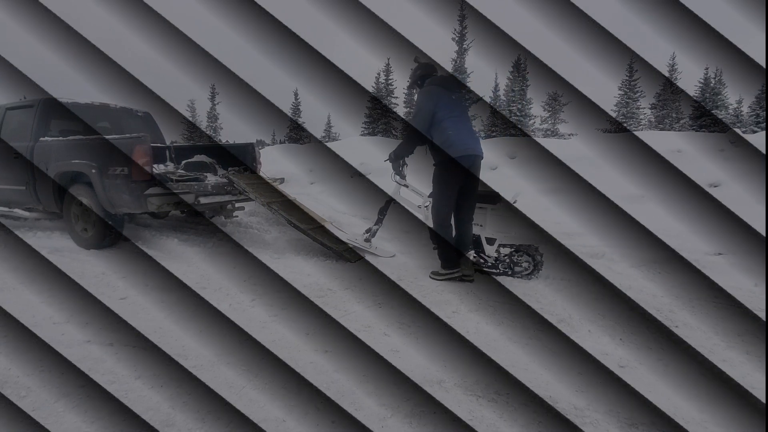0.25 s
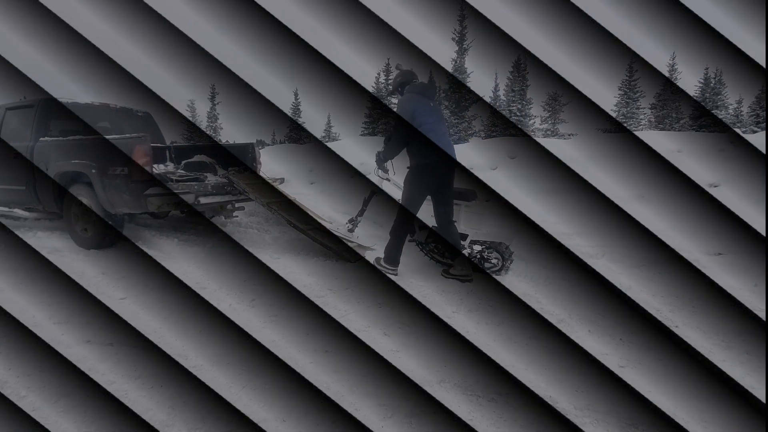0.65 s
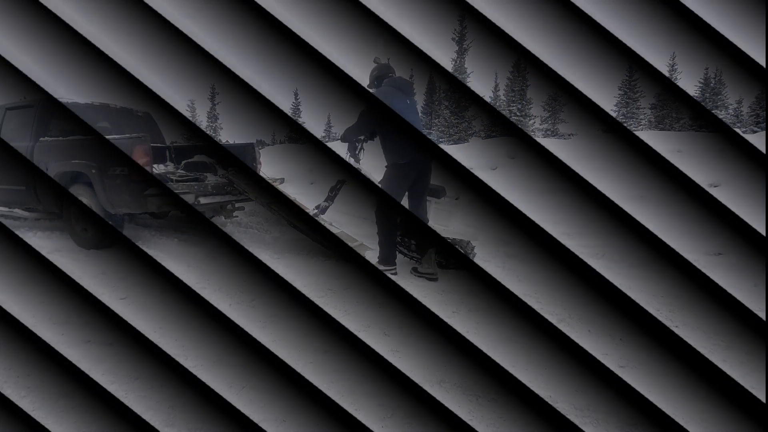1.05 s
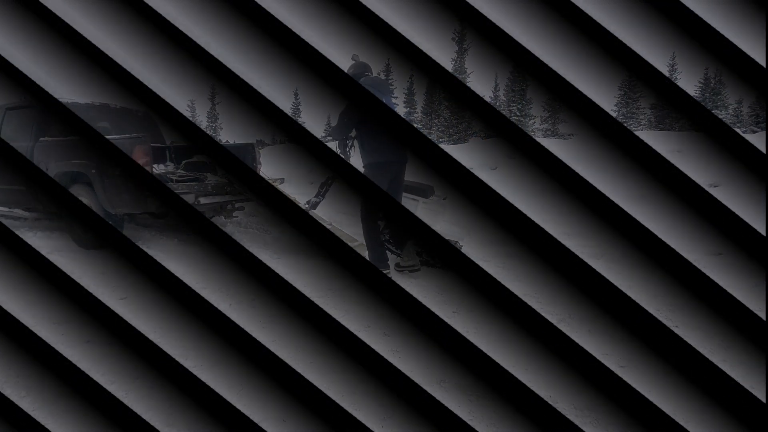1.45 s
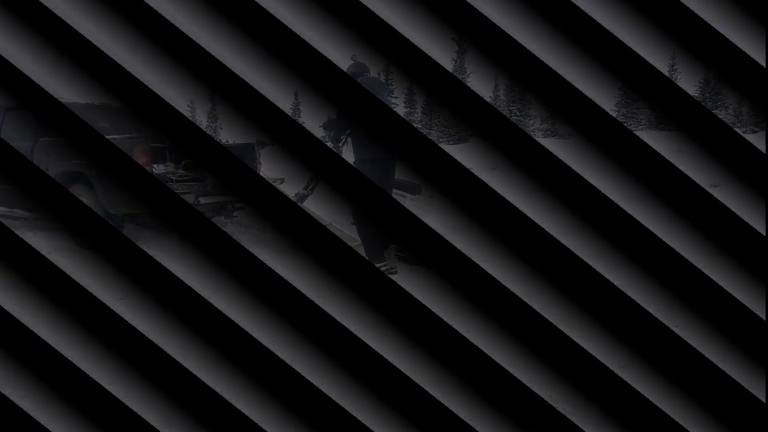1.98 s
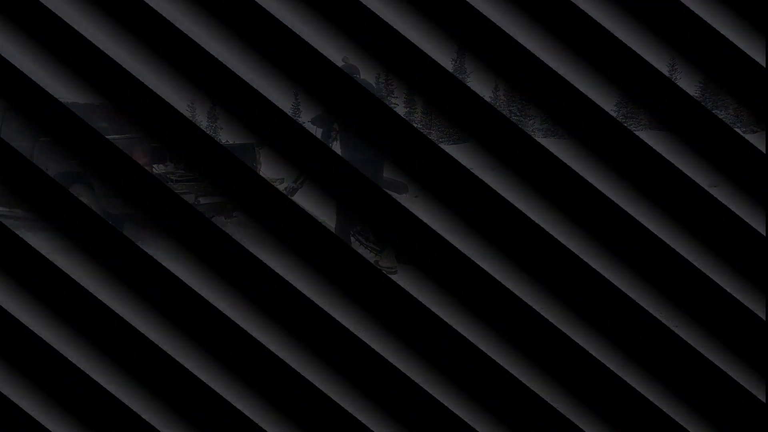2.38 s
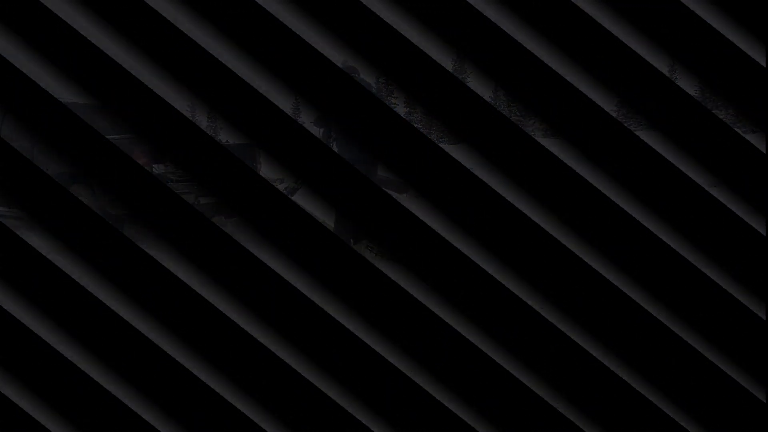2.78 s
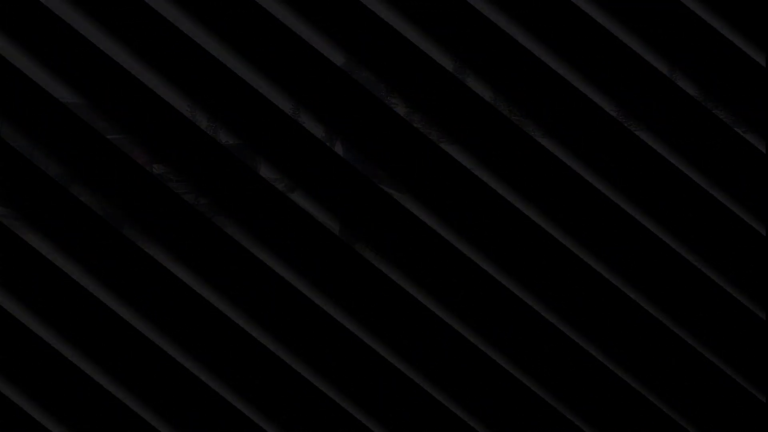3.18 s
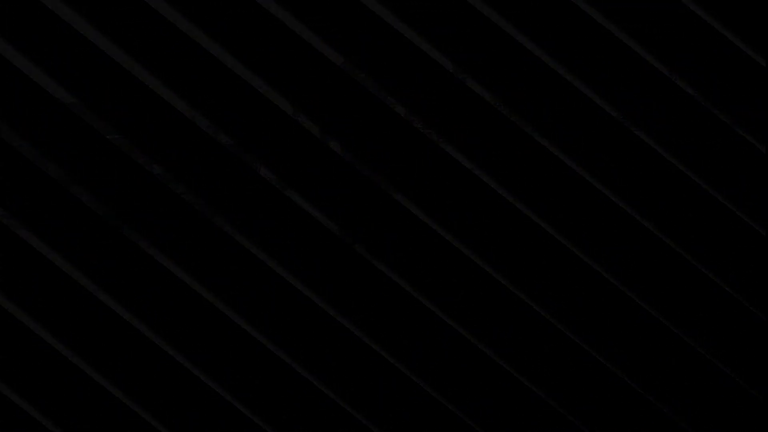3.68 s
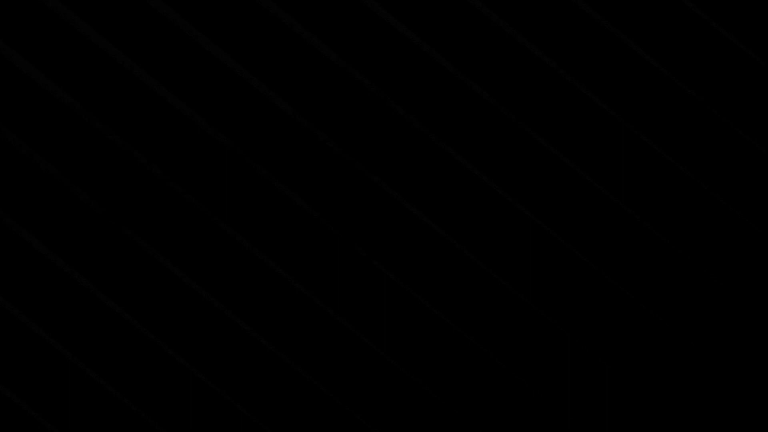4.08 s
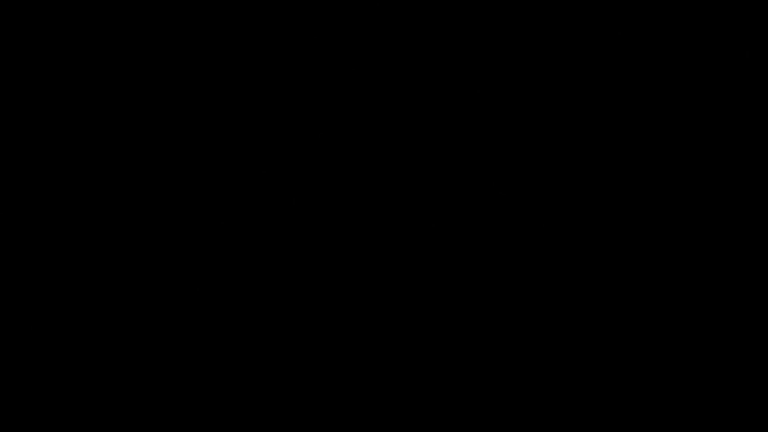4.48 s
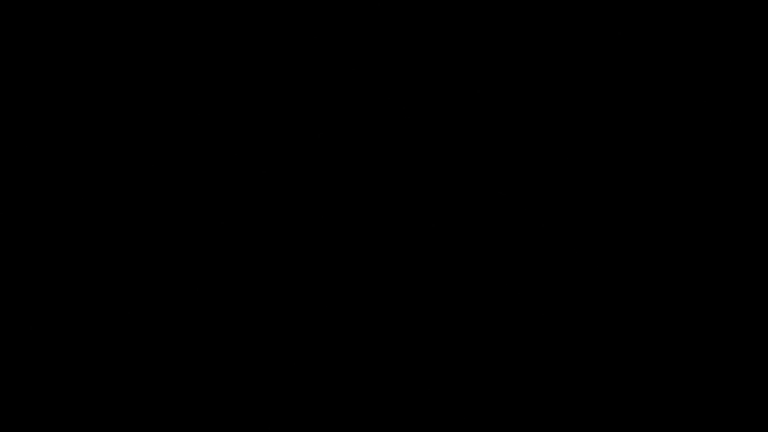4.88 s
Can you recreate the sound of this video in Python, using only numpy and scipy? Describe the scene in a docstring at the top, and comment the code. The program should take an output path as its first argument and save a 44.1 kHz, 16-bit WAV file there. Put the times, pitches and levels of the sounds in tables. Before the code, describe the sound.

Snow rustles and creaks under a clattering track with hollow thumps, a harsh gritty scrape, a pause, then loud bangs and a brief squeak.

```python
"""Outdoors on open snow: an electric tracked bike crawls over snow and up a wooden ramp.
The track rumbles and rustles as filtered noise and grains, with its effort and at every jolt.
Snow creaks in runs of grains, a hollow body booms as ringing modes, hard parts clack as noise bursts.
Halfway two layers of grains make a loud gritty scrape.
At the end a pulsed-noise rasp tightens into a harmonic squeak, with a bang."""
import sys
import numpy as np
from scipy import signal
from scipy.fft import rfft, irfft, next_fast_len
from scipy.io import wavfile
from scipy.ndimage import uniform_filter1d

SR = 44100
rng = np.random.default_rng(int(sys.argv[2]) if len(sys.argv) > 2 else 0)


def int16_out(signal):
    """Quantize to a 16-bit WAV file."""
    q = np.round(np.clip(np.atleast_2d(signal).T, -1, 1) * 32767)
    wavfile.write(sys.argv[1], SR, q.astype(np.int16))


N = 226751
PADDED = next_fast_len(N, real=True)
TIME_S = np.arange(N) / SR
FREQ_HZ = np.maximum(np.fft.rfftfreq(PADDED, 1 / SR), 1)


def undb(db):
    """Decibels to amplitude gain."""
    return 10 ** (np.asarray(db) / 20)


def unit(x):
    """Scale to rms 1."""
    return x / np.sqrt(np.mean(x ** 2))


def curves(rows):
    """Each column of a table, interpolated linearly in time."""
    s, *columns = np.transpose(rows)
    return [np.interp(TIME_S, s, column) for column in columns]


def spectra(rows):
    """Each column of a table, interpolated linearly in log frequency."""
    hz, *columns = np.transpose(rows)
    return [np.interp(np.log(FREQ_HZ), np.log(hz), column) for column in columns]


def colour(x, points):
    """Filter by a (frequency [Hz], level [dB]) spectrum, to rms 1."""
    spectrum = rfft(x, PADDED) * undb(spectra(points)[0])
    return unit(irfft(spectrum, PADDED)[..., :N])


def add(out, s, x):
    """Mix a sound in at time s."""
    start = max(int(s * SR), 0)
    out[..., start:start + x.shape[-1]] += x[..., :N - start]


def swells(rows, attack_s, t60_s):
    """Gain of events that each rise, hold and die away; their powers add."""
    power = np.zeros(N)
    t = TIME_S[:SR]
    for s, length_s, db in rows:
        rise = np.minimum(t / attack_s, 1)
        fall_db = -60 * np.maximum(t - length_s, 0) / t60_s
        add(power, s, (rise * undb(db + fall_db)) ** 2)
    return np.sqrt(power)


def grains(rate_hz, spread_db, decay_s):
    """Two channels of noise in dense little bursts, many small and a few large."""
    chance = rng.random(N)
    size = np.minimum(rng.exponential(size=N), np.pi)
    power = (chance < rate_hz / SR) * undb(spread_db * size) ** 2
    power = signal.lfilter([1], [1, -np.exp(-2 / (decay_s * SR))], power)
    return np.sqrt(power) * rng.standard_normal((2, N))


# narrow resonances of the hard sounds: (frequency [Hz], width [Hz], gain [dB])
SHELL = [(752, 86, 2), (1590, 220, 2), (3220, 530, 2), (3725, 670, 12.5), (4360, 46, 6)]


def shell(x):
    """Boost the narrow resonances in a sound, one after another."""
    for hz, width_hz, db in SHELL:
        ring = signal.lfilter(*signal.iirpeak(hz, hz / width_hz, fs=SR), x)
        x = x + (undb(db) - 1) * ring
    return x


# modes of the hollow body: (frequency [Hz], level [dB], t60 [s])
BODY = [(50, -6.5, .2), (75.6, -14.5, 0.074), (93.6, -10.5, 0.33), (106, -24, 0.13), (130, -19, 0.34),
        (166.7, 6, 0.093), (202.6, -2.5, 0.091), (220, 0.5, 0.037), (294, -4, 0.066), (377.2, 3, 0.054),
        (435.5, 2.5, 0.44), (523, -10.5, 0.045)]


def body(x):
    """Ring the hollow body's modes, in parallel, with a noise input."""
    out = 0
    for hz, db, t60_s in BODY:
        q = hz * t60_s * np.pi / np.log(1000)
        out = out + undb(db) * signal.lfilter(*signal.iirpeak(hz, q, fs=SR), x)
    return out


# track work before and after the scrape: (time [s], effort as grit level [dB], hiss before trim [dB])
APPROACH, CLIMB = [
    [(0.0, -57, -66), (0.2, -69.5, -59), (0.43, -58, -54.5), (0.62, -55, -54.5), (0.84, -57, -62.5),
     (1.22, -52, -52), (1.44, -68, -66), (1.63, -73.5, -71), (2.2, -55.5, -60.5)],
    [(2.63, -77.5, -69.5), (3.42, -74.5, -82.5), (3.55, -65.5, -69), (3.83, -58, -74.5), (3.97, -57.5, -63),
     (4.23, -59.5, -66.5), (4.49, -56.5, -62.5), (4.72, -63, -67), (5.0, -60.5, -68)],
]
# puffs of fine hiss: (time [s], length [s], level [dB])
PUFFS = [(0.68, 0.13, -52), (2.975, 0.026, -62), (3.16, .07, -64), (3.39, 0.13, -65.5), (3.79, 0.13, -59),
         (4.35, .06, -49), (4.54, 0.027, -53)]
# hiss spectrum: (frequency [Hz], level [dB])
HISS = [(2000, -26), (4500, -6.5), (8000, -2.5), (9200, 2.5), (10300, -0.5), (15500, 2)]
PUFF_ATTACK_S, PUFF_T60_S, HISS_TRIM_DB = 0.006, 0.14, 3


def hiss():
    """Fine grains, nearly all in the middle, swell with the track and come in puffs."""
    mid, side = colour(grains(rate_hz=1100, spread_db=4.5, decay_s=0.0069), HISS)
    steady = undb(curves([*APPROACH, *CLIMB])[1] + HISS_TRIM_DB)
    gain = np.hypot(steady, swells(PUFFS, PUFF_ATTACK_S, PUFF_T60_S))
    return (mid + undb(-27.5) * side * np.array([[1], [-1]])) * gain


# packed snow under load: (time [s], length [s], level [dB])
CREAKS = [(1.44, 0.031, -48.5), (1.52, 0.031, -52.5), (1.635, 0.023, -53), (1.675, 0.012, -47),
          (1.72, 0.082, -49), (1.815, 0.17, -47.5), (3.095, .04, -48), (3.58, 0.16, -48),
          (3.95, 0.084, -48.5)]
# creak spectrum: (frequency [Hz], level [dB])
CREAK = [(250, -9), (450, 1), (750, 2), (1300, -3), (1700, -13), (2300, -22), (4000, -29.5), (9000, -37)]
CREAK_ATTACK_S, CREAK_T60_S = 0.0038, 0.044


def creaks():
    """Packed snow gives way in runs of small dull cracks."""
    cracks = colour(grains(rate_hz=420, spread_db=2.0, decay_s=0.004), CREAK)
    return cracks * swells(CREAKS, CREAK_ATTACK_S, CREAK_T60_S)


# modes of a small hard part: (frequency [Hz], level [dB], t60 [s])
CLICK = [(1490, -16.5, 0.022), (3000, -15.5, 0.0063), (3710, 0.5, 0.0071), (5150, -10, 0.0067),
         (9600, -8, 0.0052)]
CLICK_S, CLICK_DB = 0.5419, -13


def click():
    """A small hard part snaps once and rings for a few milliseconds."""
    out, t = np.zeros(N), TIME_S[:SR // 10]
    modes = [np.sin(2 * np.pi * hz * t) * undb(CLICK_DB + db - 60 * t / t60_s) for hz, db, t60_s in CLICK]
    add(out, CLICK_S, sum(modes))
    return out


# hard contacts: (time [s], woody level [dB], sharp level [dB], snap level [dB], length [factor])
CLACKS = [(0.124, -37.5, -56, -64, 0.98), (0.543, -37.5, -27.5, -43, 1), (0.698, -35.5, -36.5, -49, 0.82),
          (1.004, -24, -38.5, -58, 0.97), (1.315, -30.5, -31, -30.5, 0.92), (1.635, -40, -73, -67, 0.56),
          (1.718, -44, -61, -70, 0.31), (2.22, -51.5, -59, -42, 1), (2.254, -24, -24, -59, 1.3),
          (2.289, -26, -33, -51, 3.9), (2.34, -37.5, -18, -38, 1.6), (2.351, -35.5, -23, -36, 1.6),
          (2.375, -30, -14.5, -31, 1), (2.393, -27, -27, -43, 1.6), (2.4724, -29, -17.5, -35, .6),
          (2.503, -33, -23, -42, 1), (2.551, -29, -29.5, -41.5, 1.7), (2.822, -42.5, -74, -68, 0.83),
          (2.915, -42, -41, -43.5, 0.33), (2.972, -35.5, -50, -61, 1.5), (3.3605, -34.5, -81, -76, .7),
          (3.382, -17, -48, -55, 0.87), (3.821, -24, -48, -56, 0.64), (4.241, -33.5, -40.5, -49, 0.77),
          (4.304, -43, -49.5, -49, 6.3), (4.35, -35.5, -44, -39.5, 2.1), (4.424, -28, -48, -45, 1.3),
          (4.462, -24.5, -33, -36.5, 0.79), (4.517, -37, -50, -34.5, 0.54),
          (4.565, -24.5, -29.5, -35.5, 0.97), (4.576, -32.5, -38, -41, 1.64),
          (4.634, -31, -38.5, -44.5, 1.17), (4.785, -35, -50.5, -49.5, 1.1), (5.093, -21, -35, -43, 0.86)]
CONTACT_RISE_S = 0.00025


def burst(column, spectrum, t60_s, tail_db, tail_t60_s):
    """One colour of all clacks: a fast crack plus a weaker tail, at that column's levels."""
    level, t = np.zeros(N), TIME_S[:SR // 4]
    rise = 1 - np.exp(-t / CONTACT_RISE_S)
    tail = undb(tail_db - 60 * t / tail_t60_s)
    for row in CLACKS:
        crack = undb(-60 * t / (t60_s * max(row[-1], 0.1)))
        add(level, row[0], rise * (crack + tail) * undb(row[column]))
    noise = colour(shell(rng.standard_normal((2, N))), spectrum)
    # flatten the noise so a single blow dies away evenly
    return level * noise / np.sqrt(uniform_filter1d(noise ** 2, size=200))


# clack spectra: (frequency [Hz], level [dB per Hz])
WOODY = [(150, 0), (400, 12), (620, -0.5), (850, 2), (1200, -3), (1500, -8), (2100, -8.5), (2600, -39.5),
         (5000, -52)]
SHARP = [(900, -15.5), (1900, -1), (2700, 7), (3600, -4), (4500, -0.5), (5400, -5), (7000, -8),
         (10000, -22.5), (15000, -21)]
SNAP = [(3000, -10), (6000, -4.5), (9500, -0.5), (15000, -2.5)]


def clacks():
    """Hard contacts: noise bursts in woody, sharp and snapping colours."""
    woody = burst(1, WOODY, t60_s=0.063, tail_db=-32.5, tail_t60_s=0.083)
    sharp = burst(2, SHARP, t60_s=0.025, tail_db=-25.0, tail_t60_s=0.11)
    snap = burst(3, SNAP, t60_s=0.036, tail_db=-25.5, tail_t60_s=0.06)
    return woody + sharp + snap


# heavy knocks: (time [s], peak before trim [dB], boom centre [Hz], ring length [factor])
KNOCKS = [(0.018, -26.5, 324, 6.6), (0.683, -17.5, 165, 1.5), (1.004, -10, 367, 1.05),
          (1.188, -22, 95, 1.1), (1.286, -16.5, 81, 2.9), (2.036, -22, 220, 2), (2.078, -21, 160, 1.2),
          (2.303, -12, 165, 1.9), (2.577, -16, 147, 1.13), (2.913, -23, 202.6, 1), (2.947, -16, 140, 0.94),
          (3.382, -21, 317, 1.1), (3.39, -8.5, 140, 2.4), (3.478, -18, 101, 1), (3.788, -18.5, 190, 0.65),
          (4.305, -18.5, 186.8, 5.4), (4.356, -18, 202, 1), (4.396, -10, 175, 2.3),
          (4.425, -6.5, 201, 2.44), (4.446, -0.5, 177, 0.78), (4.465, -10, 212, 1.4),
          (4.922, -21, 202, 1.3), (5.094, 0, 230, 1.25)]
KNOCK_TRIM_DB = -7


def knocks(reach_octaves=0.15, detune=0.02):
    """Each knock rings the body near its own centre; a short, damped one reaches more modes."""
    out, t = np.zeros(N), TIME_S[:SR // 2]
    hz, db, t60_s = np.transpose(BODY)[:, :, None]
    chances = rng.standard_normal((len(KNOCKS), len(BODY), 1))
    for (s, peak_db, centre_hz, length), chance in zip(KNOCKS, chances):
        length = max(length, 0.1)
        weight = undb(db) / (1 + (np.log2(hz / centre_hz) * length / reach_octaves) ** 2)
        tone = np.sin(2 * np.pi * hz * (1 + detune * chance) * t)
        ring = tone * undb(-60 * t / (t60_s * length))
        boom = np.sum(weight * ring, axis=0)
        add(out, s, boom / np.abs(boom).max() * undb(peak_db + KNOCK_TRIM_DB))
    return out


# scrape spectra: (frequency [Hz], level [dB])
SCRAPE_LOW = [(35, -14.5), (80, 2), (160, 9.5), (260, -4.5), (410, 0), (750, -4), (1050, -8.5), (1650, -9),
              (2400, -15), (5000, -33)]
SCRAPE_HIGH = [(1000, -18.5), (2400, -2.5), (3500, -3), (4500, 0.5), (5400, -5), (7500, -20.5),
               (15000, -22)]
SCRAPE_S, SCRAPE_LENGTH_S, SCRAPE_ATTACK_S, SCRAPE_T60_S = 2.225, 0.304, 0.032, 0.17
SCRAPE_LOW_DB, SCRAPE_BRIGHT_DB, SCRAPE_PEAK_S = -24, -29.5, 2.37
SCRAPE_LOW_SAG_DB_PER_S, SCRAPE_BRIGHT_SAG_DB_PER_S = 23.5, 67.5


def scrape():
    """The track slips and grinds: coarse low grains hold, bright ones peak more steeply."""
    contact = swells([(SCRAPE_S, SCRAPE_LENGTH_S, 0)], SCRAPE_ATTACK_S, SCRAPE_T60_S)
    off_peak_s = np.abs(TIME_S - SCRAPE_PEAK_S)
    grind = grains(rate_hz=700, spread_db=2.5, decay_s=0.006)
    crunch = grains(rate_hz=300, spread_db=3.5, decay_s=0.003)
    low_gain = undb(SCRAPE_LOW_DB - SCRAPE_LOW_SAG_DB_PER_S * off_peak_s)
    bright_gain = undb(SCRAPE_BRIGHT_DB - SCRAPE_BRIGHT_SAG_DB_PER_S * off_peak_s)
    low = colour(shell(grind), SCRAPE_LOW) * low_gain
    bright = colour(shell(crunch), SCRAPE_HIGH) * bright_gain
    return contact * (low + bright)


# stick-slip: (time [s], slip rate [Hz], level [dB], roughness [clipped to 0-1])
SQUEAK = [(5.005, 1097, -51.5, .98), (5.031, 1135, -30, 0.68), (5.064, 1212, -25.5, 0.63),
          (5.077, 1634, -29.5, 1.1), (5.083, 2458, -16.5, 0.22), (5.096, 2564, -15.5, 0.03),
          (5.104, 2640, -24, .1), (5.111, 2670, -22, .1), (5.14, 2660, -54, .4)]
# squeak partials: (multiple of slip rate, level [dB])
PARTIALS = [(1, 7), (2, -6.5), (3, -14), (4, -9.5), (5, -10), (6, -7)]
# rasp spectrum: (frequency [Hz], level [dB])
RASP = [(600, -34), (950, -13), (1200, -4), (1600, 1), (2300, -3.5), (3200, 4), (4200, -6.5), (8500, -17.5),
        (11000, -8), (13500, -15), (15000, -11)]


def squeak(wobble=0.22):
    """Rubber sticks and slips: a ragged rasp that speeds up and locks into a clear tone."""
    slip_hz, db, rough = curves(SQUEAK)
    rough = np.clip(rough, 0, 1)
    jitter = unit(uniform_filter1d(rng.standard_normal(N), size=24))
    phase = 2 * np.pi * np.cumsum(slip_hz * (1 + wobble * rough * jitter)) / SR
    tone = unit(sum(undb(partial_db) * np.sin(k * phase) for k, partial_db in PARTIALS))
    rasp = colour(rng.standard_normal((2, N)) * (1 + np.cos(phase)), RASP)
    mix = np.sqrt(1 - rough) * tone * np.array([[1], [0.3]]) + np.sqrt(rough) * rasp
    return mix * undb(db) * (TIME_S > SQUEAK[0][0])


# layer laws: (level at cruising effort [dB], gain per effort [dB/dB])
DEEP_LAW, BOOM_LAW, RUSTLE_LAW, GRIT_LAW = (-51.5, 0.43), (-49.5, 0.73), (-51, 0.84), (-59, 1.14)
CRUISE_DB = -60


def running(law):
    """Gain of a layer that grows with the effort of the track."""
    level_db, slope = law
    effort_db = curves([*APPROACH, *CLIMB])[0]
    return undb(level_db + slope * (effort_db - CRUISE_DB))


# jolts that shake bike and snow:
# (time [s], length [s], boom [dB], deep rumble [dB], rustle [dB], grit [dB])
JOLTS = [(0.005, 0.038, -37.5, -63, -48, -65), (0.122, 0.1, -47, -49, -52, -61),
         (0.342, .04, -38.5, -51, -50.5, -72), (0.457, 0.073, -37.5, -49, -48, -51.5),
         (0.685, 0.1, -40.5, -46, -47.5, -51.5), (1, 0.041, -35, -38, -41.5, -51),
         (1.086, 0.1, -38.5, -35, -42.5, -48.5), (1.27, 0.078, -38.5, -36.5, -43, -47.5),
         (1.396, 0.039, -46, -46, -64, -62), (2.08, 0.101, -50, -45, -54.5, -62),
         (2.557, 0.022, -40, -39.5, -46.5, -61), (2.672, 0.034, -42.5, -50, -58, -68),
         (2.909, 0.019, -35, -42, -44.5, -47.5), (2.969, 0.033, -36, -39.5, -44, -51),
         (3.11, 0.1, -45, -49.5, -55, -68), (3.387, 0.036, -28, -32.5, -36.5, -55),
         (3.448, 0.08, -45, -40.5, -46.5, -66), (3.783, 0.068, -33, -40.5, -42, -58),
         (4.091, 0.11, -39.5, -37, -46, -64), (4.354, 0.034, -27, -35, -35, -46.5),
         (4.408, 0.044, -24, -38.5, -33, -44), (4.521, 0.052, -38, -31.5, -47, -46),
         (4.673, 0.026, -44.5, -40.5, -51.5, -48), (4.921, 0.013, -25.5, -33, -43, -54.5),
         (5.057, 0.077, -29, -31.5, -39, -46)]
# deep and boom spectra: (frequency [Hz], level [dB per Hz])
DEEP = [(20, -35), (35, -17), (50, -2.5), (80, 2), (105, 2), (135, -11.5), (220, -48.5)]
BOOM = [(70, -40), (120, 2), (170, 1.5), (215, -2.5), (265, -3), (400, -8), (520, -18), (900, -26.5)]
# rustle and grit spectra: (frequency [Hz], level [dB])
RUSTLE = [(150, -1.5), (350, 7.5), (550, 1.5), (800, 0.5), (1250, -2.5), (1700, -12.5), (2300, -25),
          (4000, -35.5), (9000, -32)]
GRIT = [(900, -1.5), (1900, 6.5), (2700, -2), (3700, -8), (5000, -7.5), (7000, -8), (10000, -17.5),
        (15000, -49.5)]
JOLT_ATTACK_S = 0.0066
DEEP_T60_S, BOOM_T60_S, RUSTLE_T60_S, GRIT_T60_S = 0.63, 0.35, 0.23, 0.13


def track():
    """Lugs bump and shake the body, snow rustles and crackles under them; jolts stir it all up."""
    s, length_s, boom_db, deep_db, rustle_db, grit_db = np.transpose(JOLTS)

    def layer_gain(law, db, t60_s):
        """Running and jolt powers add."""
        return np.hypot(running(law), swells(zip(s, length_s, db), JOLT_ATTACK_S, t60_s))

    deep = colour(body(rng.standard_normal((2, N))), DEEP)
    boom = colour(body(grains(rate_hz=550, spread_db=2.0, decay_s=0.036)), BOOM)
    rustle = colour(shell(grains(rate_hz=600, spread_db=2.5, decay_s=0.0088)), RUSTLE)
    grit = colour(shell(grains(rate_hz=3800, spread_db=5.0, decay_s=0.0021)), GRIT)
    return (layer_gain(DEEP_LAW, deep_db, DEEP_T60_S) * deep
            + layer_gain(BOOM_LAW, boom_db, BOOM_T60_S) * boom
            + layer_gain(RUSTLE_LAW, rustle_db, RUSTLE_T60_S) * rustle
            + layer_gain(GRIT_LAW, grit_db, GRIT_T60_S) * grit)


# two microphone ports: (frequency [Hz], left minus right [dB], likeness [0-1], left lead [rad])
PORTS = [(60.3, 0, 1, .08), (150.4, -0.1, 0.98, 0.18), (380, 1, 1, 0.37), (700, 3, 1, 0.64),
         (1520, 6, 0.87, 0.76), (2420, 2.5, 0.3, 1.34), (4250, 7.5, 0.5, 2.26), (7750, 5.5, 0.17, 0.15),
         (15140, 0, 0.5, .3)]


def ports(x):
    """Bass reaches both ports alike; treble is stronger and earlier on the left, less alike on the right."""
    pan_db, likeness, lead_rad = spectra(PORTS)
    likeness = np.clip(likeness, 0, 1)
    shared, own = rfft(x, PADDED)
    right = likeness * shared + np.sqrt(1 - likeness ** 2) * own
    right = right * np.exp(-1j * lead_rad)
    both = np.array([shared * undb(pan_db / 2), right * undb(-pan_db / 2)])
    return irfft(both, PADDED)[:, :N]


def scene():
    """Everything is close and dry: open snow gives no echo."""
    booms = np.array([knocks(), np.zeros(N)])  # in the shared channel only
    through_ports = track() + creaks() + scrape() + clacks() + squeak() + booms
    return ports(through_ports) + hiss() + click() * np.array([[1], [0.55]])


TOP_HZ = 16100


def record(dry):
    """The microphone drops the deepest bass and cuts the top."""
    dry = signal.sosfilt(signal.butter(4, 40, "high", fs=SR, output="sos"), dry)
    return signal.sosfilt(signal.ellip(10, 0.2, 80, TOP_HZ, fs=SR, output="sos"), dry)


dry = scene()
out = record(dry)
int16_out(out)
```